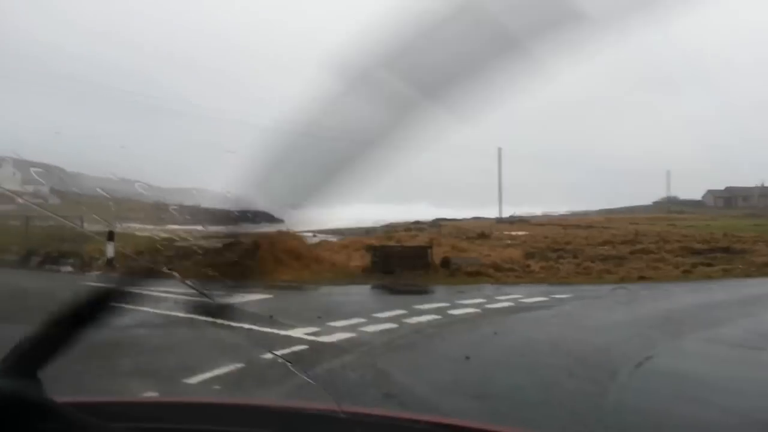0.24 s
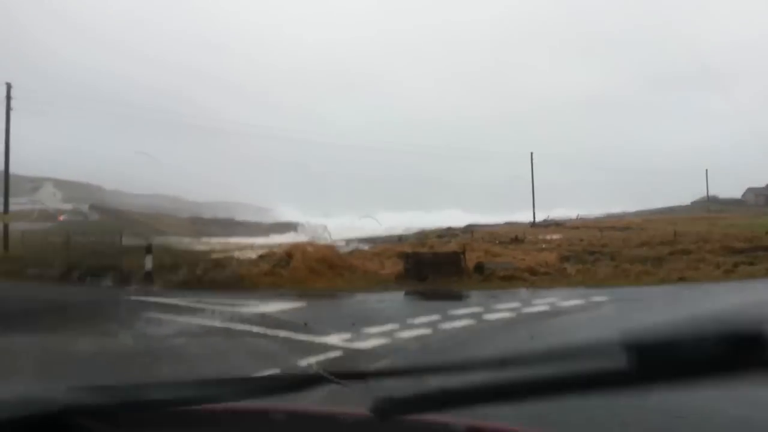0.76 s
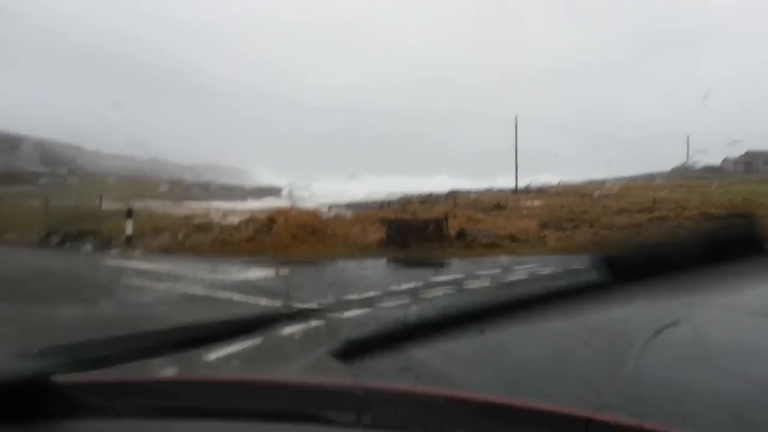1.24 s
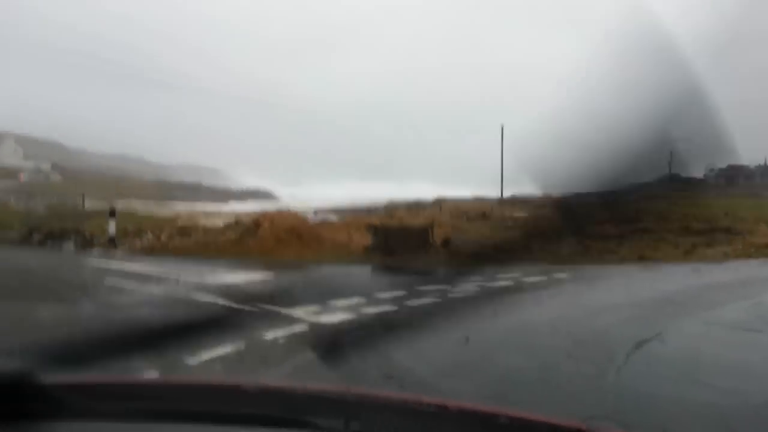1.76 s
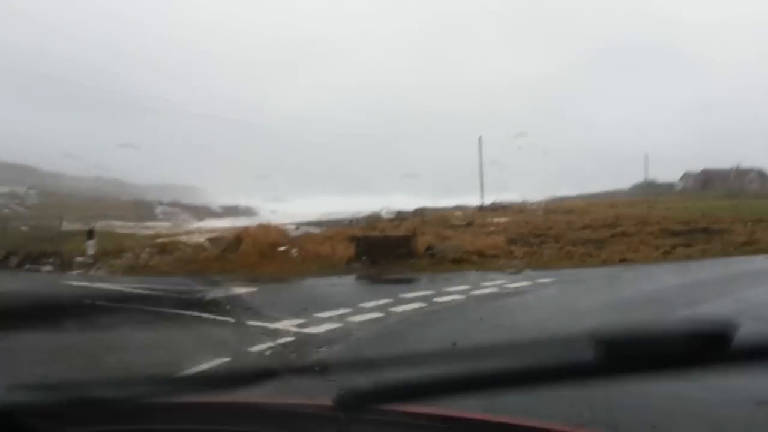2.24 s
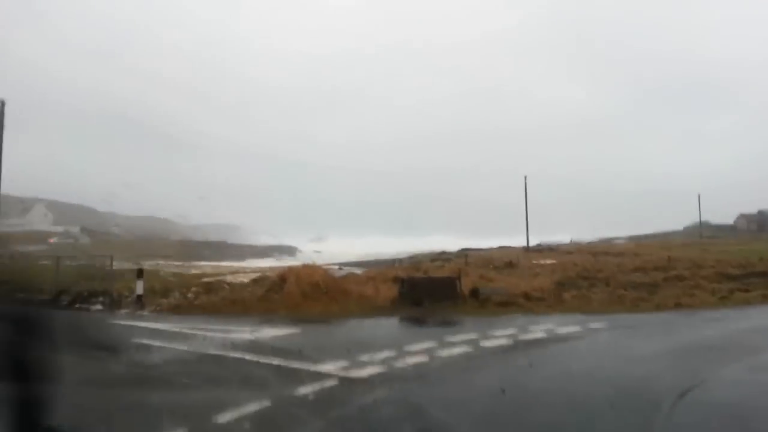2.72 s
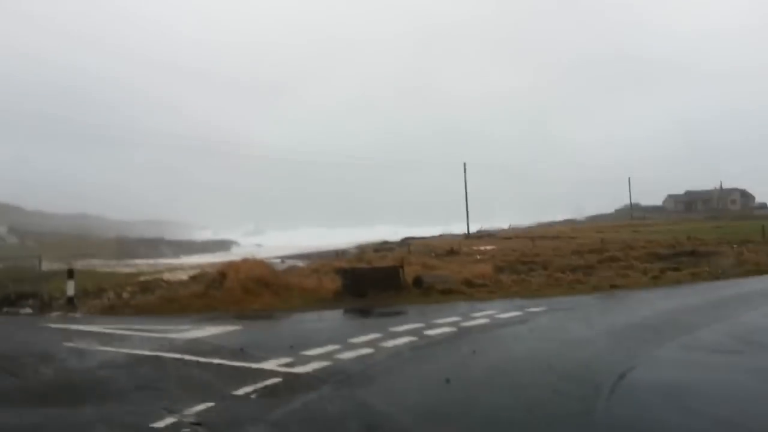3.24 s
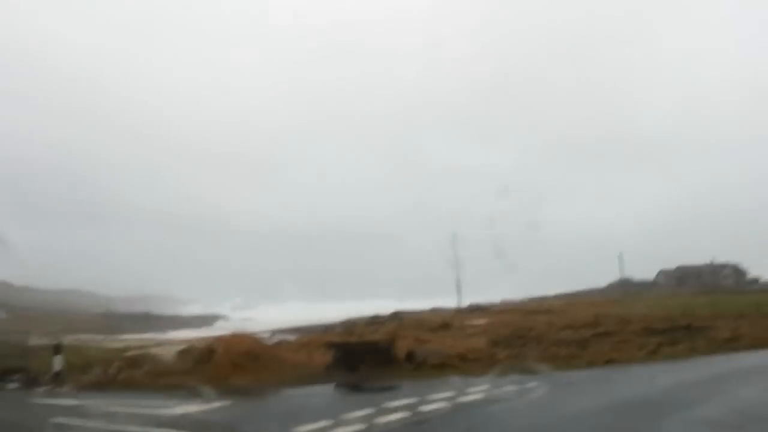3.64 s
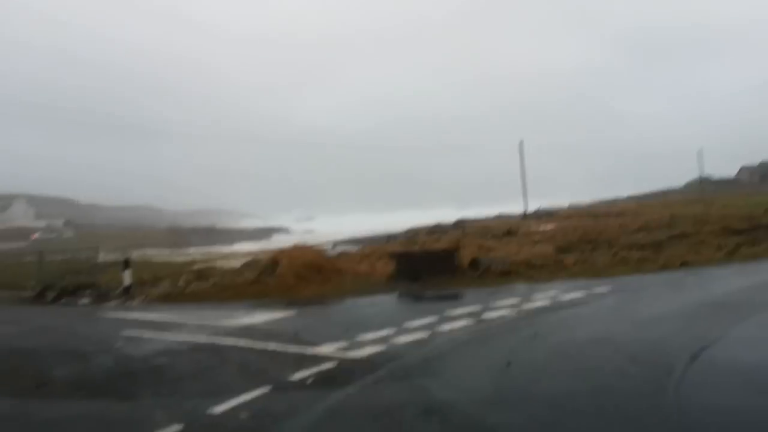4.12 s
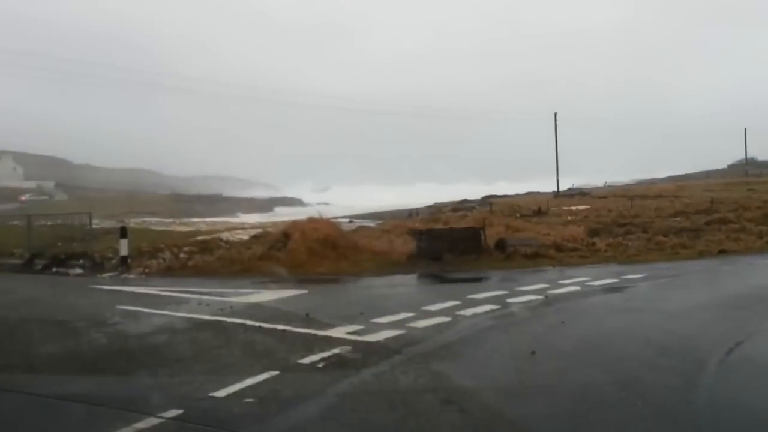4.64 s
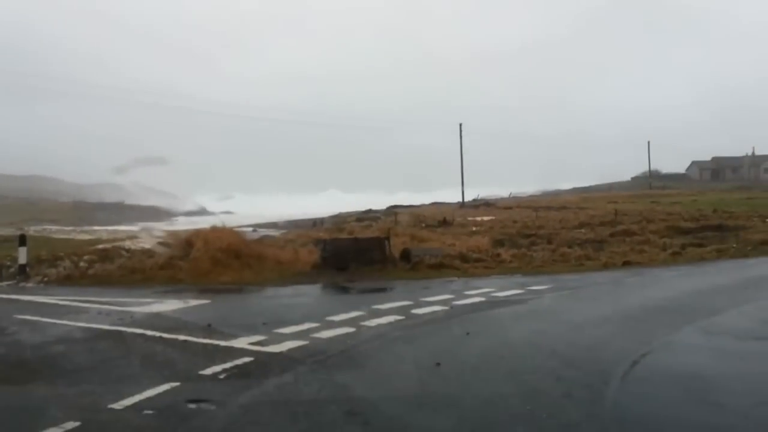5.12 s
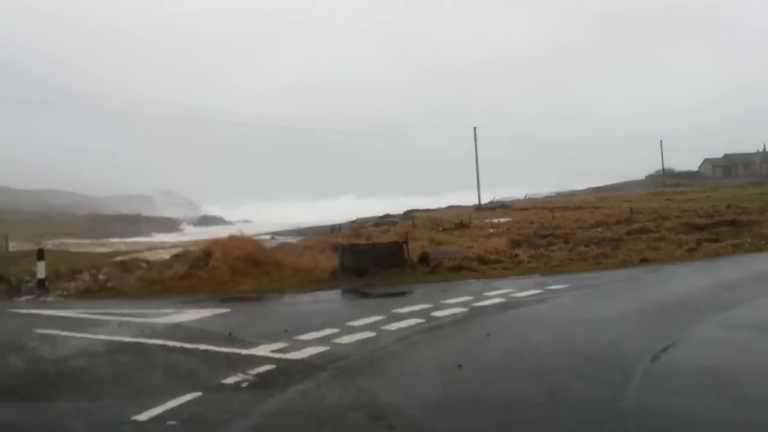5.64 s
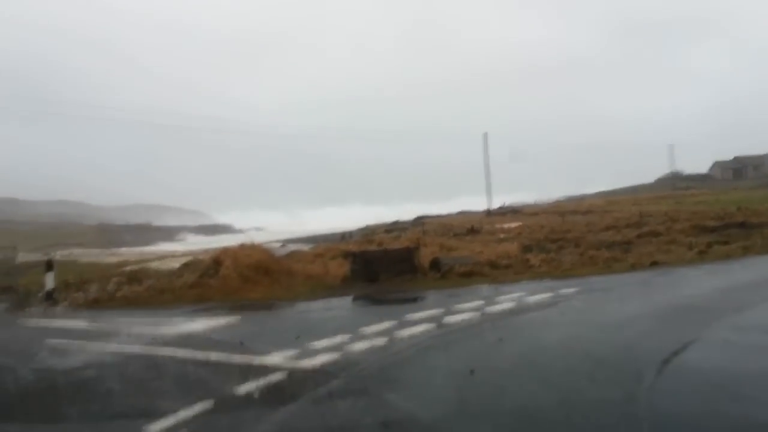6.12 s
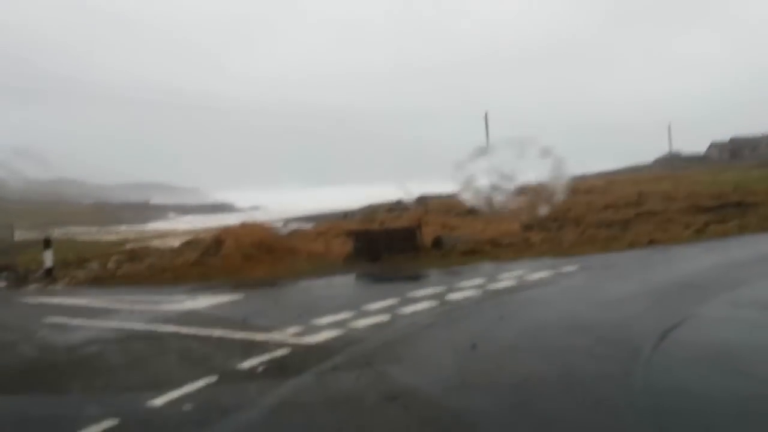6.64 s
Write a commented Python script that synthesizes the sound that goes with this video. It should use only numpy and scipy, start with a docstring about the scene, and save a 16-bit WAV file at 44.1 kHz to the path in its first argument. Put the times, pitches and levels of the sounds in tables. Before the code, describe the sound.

Inside a car in a storm: dull gusting wind, spattering rain, slapping windscreen wipers and distorted wind thumps on the right.

```python
"""Inside a car standing on the coast in a gale, a pair of microphones 14 cm apart.
Wind presses on the body and roars dully through the cabin. Sheets of rain patter on glass and roof,
with a few heavy splashes; short bright clicks and puffs of grainy hiss come through. The wiper motor
whines faintly and the blades slap about once a second. A draught reaches the right microphone and
buffets it into overload; the left one sits in the lee."""
import sys
import numpy as np
from scipy import signal
from scipy.fft import rfft, irfft
from scipy.io import wavfile
from scipy.ndimage import uniform_filter1d

SR = 44100
rng = np.random.default_rng(int(sys.argv[2]) if len(sys.argv) > 2 else 0)


def materialize(psi):
    """Save the field psi as 16-bit PCM at rate SR to the path in sys.argv[1].

    A 1-D psi becomes a single channel; in a 2-D psi each row is a channel.
    """
    bounded = np.clip(np.atleast_2d(psi).T, -1, 1)
    quanta = np.round(bounded * 32767).astype(np.int16)
    wavfile.write(sys.argv[1], SR, quanta)


N = 302967

# wind between gusts, heard through the body of the car: time_s, level_db
WIND = [(0.3, -23.5), (1.6, -24.5), (2.5, -23.5), (4.2, -19), (5.9, -22), (6.85, -19.5)]
# gusts that lean on the car: crest_s, rise_db, length_s
GUSTS = [(0.7, 2, 0.046), (1.05, 3, 0.18), (1.386, 4.5, 0.23), (1.784, 3.5, 0.17), (2.06, 5.5, 0.12),
         (2.356, 5.5, 0.19), (2.645, 5, 0.18), (2.852, 5, 0.13), (3.14, 3, 0.29), (3.442, 3, 0.076),
         (3.803, 3, 0.13), (4.2, 1.5, 0.12), (4.485, 3.5, 0.056), (5.19, 3.5, 0.29), (5.66, 3.5, 0.23),
         (6.278, 2.5, 0.074), (6.76, 4, 0.073)]
# resonances of the cabin and its panels: pitch_hz, width_hz, gain_db
CABIN_MODES = [(192.5, 50, -6), (286, 56, -2.5), (468, 53, -9.5), (627, 58, -5), (704, 10, -7.5),
               (882, 112, -2), (1150, 74, 0), (1465, 140, 3)]
# rain on the windows between sheets: time_s, patter_db, spray_db
RAIN = [(0.3, -30.5, -47), (0.45, -28.5, -41), (0.87, -28.5, -50), (1.6, -30.5, -48), (2.3, -28, -41.5),
        (2.55, -29.5, -47.5), (3.0, -26.5, -47.5), (3.55, -28.5, -51.5), (4.15, -26, -49.5),
        (4.38, -28.5, -54), (5.2, -26, -48), (5.42, -29, -53), (5.95, -28.5, -50.5), (6.3, -26.5, -48),
        (6.85, -28.5, -53)]
# sheets of rain thrown at the car: start_s, rise_db, release_s
SHEETS = [(0.64, 1.5, 0.14), (0.955, 3, 0.041), (1.31, 2.5, 0.11), (1.7, 3.5, 0.038), (1.99, 2, 0.088),
          (2.61, 3.5, 0.14), (2.82, 2, 0.13), (3.65, 3.5, .17), (4.41, 2, .11), (4.62, 1, 0.068),
          (4.87, 2, 0.081), (5.03, 1.1, 0.13), (5.56, 2.5, 0.18), (6.49, 1, 0.046)]
# water sizzling on the right-hand glass: time_s, level_db
SIZZLE = [(0.3, -44), (0.5, -36), (0.85, -44), (1.02, -36), (1.6, -42), (2.4, -38.5), (3.5, -46),
          (6.85, -47.5)]
# steady draught on the right microphone: time_s, level_db
DRAUGHT = [(0.3, -47), (2.4, -34), (2.62, -23), (6.85, -22)]
# partials of the wiper motor at its loudest: pitch_hz, level_db
WHINE = [(359, -39), (718, -38), (1083, -46)]
# short bright clicks with crackling tails: start_s, click_db, left_minus_right_db, tail_db, decay_s
TICKS = [(0.639, -10.5, -38, -44, .04), (0.6503, -14, -2, -22, .06), (1.386, -13, -14, -38, .05),
         (1.411, -9, 2, -32, .04), (1.917, -18, 2, -34, .06), (2.595, -21, 0, -32, .06),
         (2.655, -18, 4, -23, .045), (2.846, -20, 6, -31, 0.13), (3.623, -26, 2, -34, .14),
         (3.677, -23, 2, -37, .1), (4.838, -27, 2, -38, .13), (4.878, -20, 2, -35, .08),
         (6.367, -19, 2, -32, .04)]
# heavy drops on glass and roof: start_s, level_db, decay_s, left_minus_right_db
SPLASHES = [(0.649, -21.5, 0.25, -2), (1.523, -27, 0.027, -3), (1.717, -21.5, .06, 0),
            (2.493, -20.5, 0.063, -1), (2.657, -21, 0.037, -11), (2.703, -23, .08, 2), (3.381, -23, .04, 2),
            (3.693, -22.5, .09, -1), (3.725, -23, .1, -2), (3.79, -23, .06, -2), (3.882, -17, 0.037, -1),
            (3.918, -18.5, 0.038, 0), (4.44, -21, .05, -3), (4.733, -19.5, .06, 2), (4.877, -20, .04, 0),
            (5.106, -26, 0.037, -3), (5.368, -23, 0.033, -2), (6.508, -21, .04, -2),
            (6.530, -21, 0.059, -4)]
# brief puffs of bright, grainy hiss: start_s, level_db, release_s, left_minus_right_db
PUFFS = [(0.955, -44, .05, -4), (2.795, -40, .06, 4), (3.64, -42, 0.13, 3), (4.85, -40, .09, 3)]
# blades turning at the foot of the windscreen: start_s, slap_db, decay_s, thud_db
WIPER_TURNS = [(0.985, -26.5, .26, -22.5), (2.009, -22, .12, -21.5), (3.054, -17.5, .06, -27),
               (4.112, -18, .055, -30), (5.161, -15, 0.085, -21), (6.214, -19.5, 0.078, -28)]
# the hardest eddies to hit the right microphone: centre_s, level_db, length_s
BUFFETS = [(2.586, -13, 0.0051), (2.693, -13, 0.012), (2.727, -10, 0.0064), (2.744, -12, 0.0048),
           (2.785, -9, 0.005), (2.797, 1, .006), (2.942, -10.5, 0.0048), (2.962, -6, 0.0082),
           (3.019, -14.5, 0.013), (3.064, -9.5, 0.011), (3.145, -13, 0.0042), (3.163, -15, 0.0073),
           (3.295, -3, .014), (3.326, -7.5, 0.009), (3.337, -13, 0.0031), (3.41, -15, 0.017),
           (3.48, -2, 0.0094), (3.493, -4, 0.0046), (3.509, -16, 0.0086), (3.521, -16, 0.0031),
           (3.55, -9.5, 0.011), (3.58, -10, 0.0035), (3.595, -12, .004), (3.615, -12, 0.0098),
           (3.628, -13, 0.0123), (3.839, -8, 0.0052), (3.886, -7.5, 0.01), (4.004, -8, 0.0062),
           (4.018, -7.5, 0.015), (4.07, -10, 0.0058), (4.089, -7, 0.0046), (4.128, -19, 0.0073),
           (4.186, -4, 0.0049), (4.227, -12, 0.0054), (4.257, -10, 0.0081), (4.457, -14, 0.019),
           (4.518, -5.5, 0.0056), (4.596, -9, 0.0071), (4.825, -13.5, 0.015), (4.845, -4.5, 0.005),
           (4.949, -8, 0.0091), (4.982, -7, 0.009), (5.118, -13, 0.0069), (5.2, -9.5, 0.015),
           (5.248, -10.5, 0.0069), (5.273, -7.5, 0.0061), (5.415, -9, 0.006), (5.431, -13, 0.0052),
           (5.476, -9.5, 0.017), (5.533, -8, 0.0051), (5.565, -12, 0.0047), (5.811, -5, 0.011),
           (5.831, -6, 0.0052), (5.898, -12.5, 0.0042), (5.908, -7, .006), (5.934, -7, 0.006),
           (6.134, 0.5, 0.017), (6.153, -16, .008), (6.247, -10.5, 0.018), (6.377, -15, 0.0035),
           (6.415, -7, 0.014), (6.461, -8, 0.0078), (6.721, -10.5, 0.0043), (6.745, -16, 0.0074)]
# hollow knocks of the gusts: centre_s, level_db, length_s, pitch_hz
KNOCKS = [(5.48, -14, 0.03, 695), (5.808, -7.5, 0.016, 830)]
# tone of each sound at the microphones: frequency_hz, relative_db
ROAR_COLOUR = [(25, -50), (60, -19.5), (100, -11), (170, -2.5), (280, -2), (390, -2.5), (650, -4),
               (1000, -11), (1400, -15), (2200, -20.5), (4000, -25.5), (9000, -97)]
PATTER_COLOUR = [(300, -27), (900, -19.5), (1700, -0.5), (2700, 0.5), (3400, -1), (4400, -6), (5100, -12.5),
                 (5900, -16.5), (9000, -21), (15000, -89)]
SPRAY_COLOUR = [(2000, -1), (4500, -16), (6500, 3), (8200, -6), (10200, -3), (12000, -14), (15000, -52)]
BUFFET_COLOUR = [(20, -66), (60, -31), (100, -12), (170, -2), (280, 3.5), (450, -2), (650, -5), (900, -22),
                 (1400, -29.5), (4000, -78)]
TICK_COLOUR = [(400, -16), (1800, -19), (3800, 4), (6000, -4.5), (10000, -14), (15000, -15)]
SPLASH_COLOUR = [(300, -21), (1200, 5), (1900, 8), (2500, 19.5), (3300, 13.5), (4600, 3), (6000, -4),
                 (10000, -14), (15000, -63)]
PUFF_COLOUR = [(400, -21), (1800, -15), (3800, 5), (6000, -9), (10000, -10), (12000, -9), (15000, -36)]
SLAP_COLOUR = [(300, -18), (1200, 1), (1900, 14), (2500, 20), (3300, 12.5), (4600, 4), (6000, -10.5),
               (10000, -25), (15000, -63)]

MIC_SPACING_M, SOUND_M_PER_S = .142, 343
TIME_S = np.arange(N) / SR


def from_db(db):
    """Decibels to gain."""
    return 10 ** (np.asarray(db) / 20)


def rms_one(x):
    """Scale to rms 1."""
    return x / np.sqrt(np.mean(x ** 2) + 1e-20)


def in_time(rows):
    """The columns of a curve, at every sample."""
    time_s, *columns = np.transpose(rows)
    return [np.interp(TIME_S, time_s, column) for column in columns]


def pan(balance_db):
    """Gains at the two microphones; positive leans left."""
    return from_db(np.array([[.5], [-.5]]) * balance_db)


def drift(rate_hz):
    """A slow random wander of spread 1: noise at every 40th sample, low-passed twice."""
    r = np.exp(-80 * np.pi * rate_hz / SR)
    slow = signal.lfilter([1], [1, -2 * r, r * r], rng.standard_normal(N // 40 + 2002))[2000:]
    return np.interp(np.arange(N) / 40, np.arange(len(slow)), rms_one(slow))


def swell(centre_s, length_s):
    """A bell-shaped rise and fall, above one half for length_s."""
    offset = (TIME_S - centre_s) / length_s
    return .5 ** ((2 * offset) ** 2) * (np.abs(offset) < 2)


def surge(start_s, release_s, attack_s=.038):
    """A quick rise, then a smooth fall."""
    age = TIME_S - start_s
    fall = np.exp(-np.clip((age - attack_s) / release_s, 0, 10) ** 2)
    return np.clip(age / attack_s, 0, 1) * fall


def colour(x, spectrum, size=4096):
    """Minimum-phase filter with the given spectrum; white noise keeps its level."""
    hz, level_db = np.transpose(spectrum)
    bins_hz = np.maximum(np.arange(size // 2 + 1) * SR / size, 1)
    gain = from_db(np.interp(np.log(bins_hz), np.log(hz), level_db))
    cepstrum = irfft(np.log(gain))
    cepstrum[1:size // 2] *= 2
    cepstrum[size // 2 + 1:] = 0
    response = irfft(np.exp(rfft(cepstrum)))
    return signal.oaconvolve(x, response[None] / np.linalg.norm(response), axes=1)[:, :N]


def resonance(x, hz, width_hz):
    """Band-pass with gain 1 at its peak."""
    r = np.exp(-np.pi * width_hz / SR)
    feedback = [1, -2 * r * np.cos(2 * np.pi * hz / SR), r * r]
    return signal.lfilter((1 - r * r) / 2 * np.array([1, 0, -1]), feedback, x)


def narrow_noise(hz, width_hz):
    """Stereo noise in one steep-sided band; rms 1."""
    band = resonance(rng.standard_normal((2, N)), hz, width_hz)
    return rms_one(resonance(band, hz, width_hz))


def all_around(source, lean_db, count=12):
    """Unrelated copies of a source round the pair, louder to one side, each with its own lag."""
    out = np.zeros((2, N))
    for angle in (np.arange(count) + rng.uniform(.2, .8, count)) * np.pi / count:
        lag = round(MIC_SPACING_M * np.cos(angle) / SOUND_M_PER_S * SR)
        sound = source() * from_db(lean_db * np.cos(angle))
        out += [sound, np.roll(sound, lag)]
    return rms_one(out)


def turbulence(swell_db, rate_hz):
    """Noise that swells and sinks at random."""
    return rng.standard_normal(N) * from_db(swell_db * drift(rate_hz))


def roar(mode_swell_db=3):
    """Wind presses on all sides, harder in gusts, and rings now one cabin panel, now another."""
    wind = all_around(lambda: turbulence(swell_db=1.5, rate_hz=27), lean_db=-2, count=8)
    pressure = colour(wind, ROAR_COLOUR)
    boom = sum(from_db(gain_db + mode_swell_db * drift(3.2)) * resonance(pressure, hz, width_hz)
               for hz, width_hz, gain_db in CABIN_MODES)
    wind_db, = in_time(WIND)
    gust_db = sum(rise_db * swell(crest_s, length_s) for crest_s, rise_db, length_s in GUSTS)
    return from_db(wind_db + gust_db) * rms_one(pressure + boom) * pan(balance_db=-.5)


def impacts(per_s, size_db, clump_db):
    """Impulses at random moments, in clumps, uneven in size."""
    hits = np.flatnonzero(rng.random(N) < per_s * from_db(clump_db * drift(14)) / SR)
    chance, out = rng.random(N)[hits], np.zeros(N)
    sizes = from_db(size_db * np.minimum(-np.log(1 - chance), 4))
    out[hits] = sizes * (-1) ** hits   # pushes and pulls alike
    return out


def rain():
    """Drops patter on the windward glass to the right, denser in sheets; torn spray hisses left."""
    patter_db, spray_db = in_time(RAIN)
    sheet_db = sum(rise_db * surge(start_s, release_s) for start_s, rise_db, release_s in SHEETS)
    patter_db, spray_db = patter_db + sheet_db, spray_db + 2 * sheet_db
    per_s = 500 * from_db(patter_db - patter_db.mean())
    flurry_db = .6 * drift(22)
    drops = all_around(lambda: impacts(per_s, size_db=1, clump_db=4), lean_db=.5)
    fine_drops = all_around(lambda: impacts(2 * per_s, size_db=2, clump_db=4.5), lean_db=8, count=8)
    patter = colour(drops, PATTER_COLOUR) * from_db(patter_db) * pan(balance_db=-2.5)
    spray = colour(fine_drops, SPRAY_COLOUR) * from_db(spray_db) * pan(balance_db=6.5)
    return (patter + spray) * from_db(flurry_db)


def wet_glass():
    """Water sizzles brightly on the right-hand glass."""
    sizzle_db, = in_time(SIZZLE)
    sizzle = narrow_noise(hz=4140, width_hz=1440) * from_db(sizzle_db + 2.7 * drift(22))
    return sizzle * pan(balance_db=-7)


def port_thuds(per_s, even_s):
    """Pressure pulses thud through each microphone port; their level is evened over even_s."""
    pulses = np.array([impacts(per_s, size_db=3, clump_db=2) for mic in range(2)])
    thuds = colour(pulses, BUFFET_COLOUR)
    power = np.abs(uniform_filter1d(thuds ** 2, round(even_s * SR)))
    return thuds / np.sqrt(power + 1e-9)


def draught(wake_db=-23, wake_s=.048, lee_hz=140, lee_db=2.5, rasp_db=-16, small_eddy_db=23):
    """Moving air thuds and rasps on the right port; the left, in the lee, gets a dull rumble."""
    steady_db, = in_time(DRAUGHT)
    # each eddy travels in a patch of stirred air; a hard eddy is compact and stirs less
    wake_power = sum(from_db(wake_db - .2 * level_db) ** 2 * swell(centre_s, wake_s)
                     for centre_s, level_db, _ in BUFFETS)
    stirred = np.sqrt(from_db(steady_db) ** 2 + wake_power)
    lee, windward = port_thuds(per_s=300, even_s=.07)
    rumble = from_db(lee_db) * signal.sosfilt(signal.butter(2, lee_hz, fs=SR, output="sos"), lee)
    small_eddies, = colour(impacts(per_s=4, size_db=-7, clump_db=2)[None], BUFFET_COLOUR)
    small_eddies *= from_db(steady_db + small_eddy_db)
    rasp = narrow_noise(hz=1050, width_hz=810)[1] * np.abs(windward) * from_db(rasp_db)
    return np.array([rumble * stirred, (windward + rasp) * stirred + small_eddies])


def wiper_motor(sweep_s=1.045, first_crest_s=.35, dip_db=17):
    """The motor whines faintly, loudest once in every sweep, its speed wavering with the load."""
    turned_s = np.cumsum(1 + .00298 * drift(2.81)) / SR
    slack = np.sin(np.pi * (TIME_S - first_crest_s) / sweep_s) ** 2
    whine = sum(from_db(level_db) * np.sqrt(2) * np.sin(2 * np.pi * hz * turned_s)
                for hz, level_db in WHINE)
    return from_db(-dip_db * slack) * whine


def ticks():
    """Short bright clicks, each with a brief crackling tail."""
    out = np.zeros((2, N))
    age = np.arange(SR // 4) / SR
    for start_s, click_db, balance_db, tail_db, decay_s in TICKS:
        tick = from_db(tail_db - 60 * age / decay_s) * rng.standard_normal((2, len(age)))
        tick[:, 0] = from_db(click_db)
        start = round(start_s * SR)
        out[:, start:start + len(age)] += tick * pan(balance_db)
    return colour(out, TICK_COLOUR)


def spatter(samples, grain_db=2.5):
    """Stereo grains of very uneven size; rms 1."""
    noise = rng.standard_normal((2, samples))
    return rms_one(noise * from_db(grain_db * rng.standard_normal((2, samples))))


def splashes():
    """Water bursts on a pane into a dying spatter; longer splashes also drum on the roof overhead."""
    glass, roof = np.zeros((2, 2, N))
    for start_s, level_db, decay_s, balance_db in SPLASHES:
        start = round(start_s * SR)
        age = np.arange(min(SR // 4, N - start)) / SR
        burst = from_db(level_db - 60 * age / decay_s) * spatter(len(age))
        glass[:, start:start + len(age)] += burst * pan(balance_db)
        roof[:, start:start + len(age)] += burst[0] * (decay_s / .33) ** 2
    return colour(glass, SPLASH_COLOUR) + colour(roof, ROAR_COLOUR)


def hiss_puffs():
    """Brief puffs of bright, grainy hiss, each a little to one side."""
    grains = np.array([impacts(per_s=600, size_db=3.5, clump_db=3) for mic in range(2)])
    gain = sum(from_db(level_db) * surge(start_s, release_s) * pan(balance_db)
               for start_s, level_db, release_s, balance_db in PUFFS)
    return rms_one(colour(grains, PUFF_COLOUR)) * gain


def wiper_blades(thud_delay_s=.033):
    """At the foot of the windscreen the wet rubber flips with a slap; the arms thud as they turn."""
    slap_gain, thud_gain = np.zeros((2, N))
    for start_s, slap_db, decay_s, thud_db in WIPER_TURNS:
        age = TIME_S - start_s
        slap_gain += from_db(slap_db - 60 * np.clip(age / decay_s, 0, 3)) * (age >= 0)
        thud_gain += from_db(thud_db) * swell(start_s + thud_delay_s, length_s=.067)
    slaps = colour(slap_gain * spatter(N), SLAP_COLOUR) * pan(balance_db=-4)
    return slaps + thud_gain * narrow_noise(hz=274, width_hz=200)


def buffeting(slap_db=24.5, rasp_db=-15.5):
    """The front of each eddy slaps the right microphone, and a short low flutter follows."""
    power, slaps = np.zeros((2, 2, N))
    for centre_s, level_db, length_s in BUFFETS:
        near = slice(round((centre_s - .1) * SR), round((centre_s + .1) * SR))
        burst = .5 ** (np.abs(2 * (TIME_S[near] - centre_s) / length_s) ** 3)   # abrupt at both ends
        power[1, near] += from_db(level_db) ** 2 * burst
        front = round((centre_s - length_s / 2) * SR)
        slaps[1, front] = from_db(level_db + slap_db) * rng.choice([-1, 1])
    flutter = port_thuds(per_s=900, even_s=.009) * np.sqrt(power)
    # the hardest eddies break up at the port and rasp
    rasp = from_db(rasp_db) * narrow_noise(hz=950, width_hz=880) * power ** 1.4
    return flutter + colour(slaps, BUFFET_COLOUR) + rasp


def knocks():
    """A gust gives a compact, hollow knock on the right, higher than the buffets."""
    out = sum(from_db(level_db) * swell(centre_s, length_s) * narrow_noise(pitch_hz, width_hz=370)
              for centre_s, level_db, length_s, pitch_hz in KNOCKS)
    return out * from_db([[-16], [0]])


def scene():
    """From the cabin: gale and rain all round, wipers on the glass, wind right on the microphones."""
    return (roar() + rain() + hiss_puffs() + wet_glass() + splashes() + ticks()
            + wiper_motor() + wiper_blades() + draught() + buffeting() + knocks())


def record(dry, fade_in_s=(.238, .305), hardness=40, stop_hz=16000):
    """The recorder fades in, clips hard at full scale, which crackles, and cuts the top."""
    opened = dry * np.interp(TIME_S, fade_in_s, [0, 1])
    clipped = opened / (1 + np.abs(opened) ** hardness) ** (1 / hardness)
    return signal.sosfilt(signal.cheby2(12, 70, stop_hz, fs=SR, output="sos"), clipped)


dry = scene()
out = record(dry)
materialize(out)
```